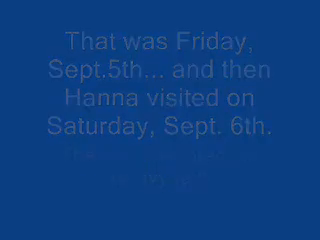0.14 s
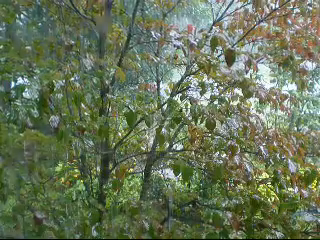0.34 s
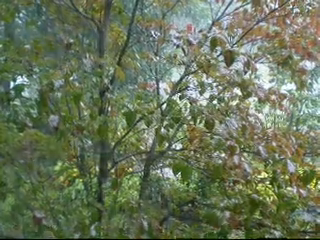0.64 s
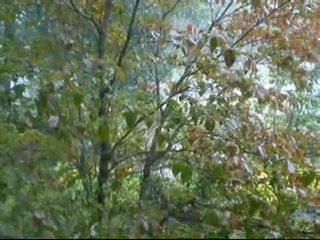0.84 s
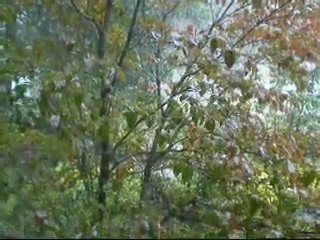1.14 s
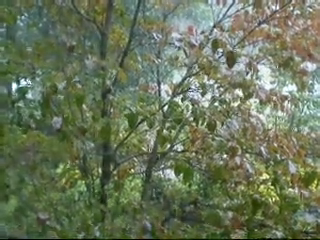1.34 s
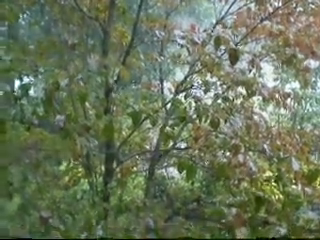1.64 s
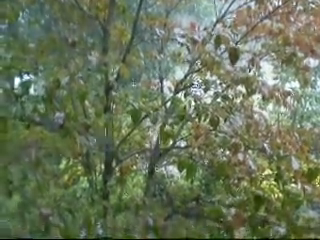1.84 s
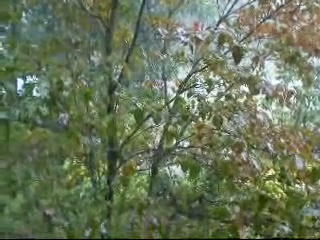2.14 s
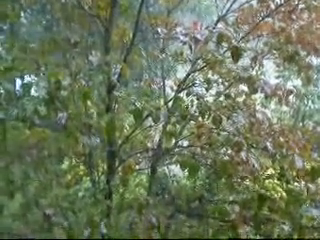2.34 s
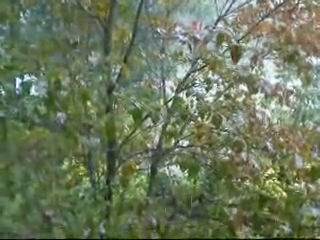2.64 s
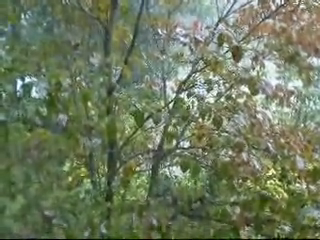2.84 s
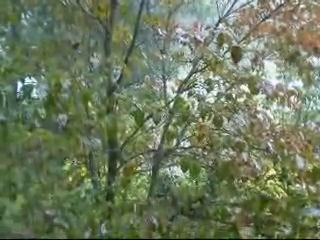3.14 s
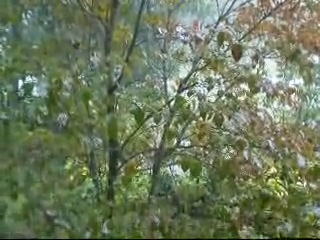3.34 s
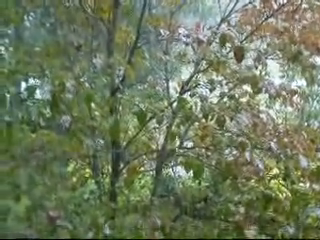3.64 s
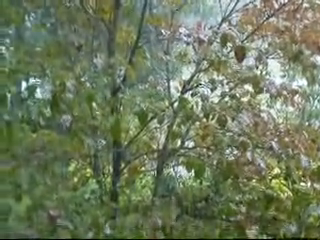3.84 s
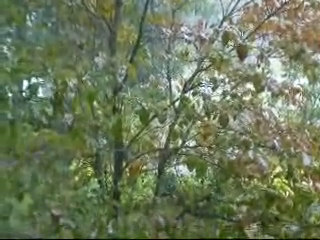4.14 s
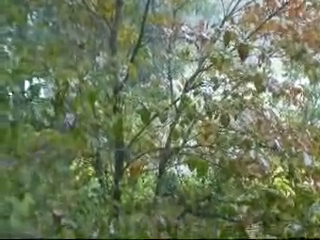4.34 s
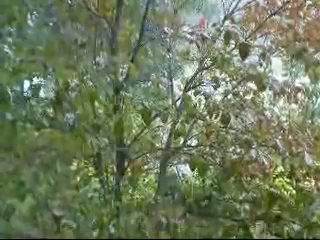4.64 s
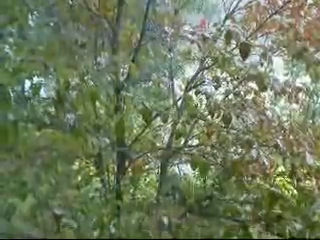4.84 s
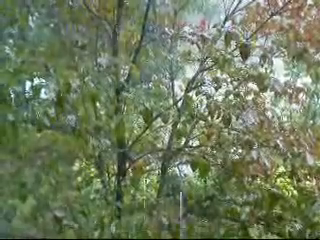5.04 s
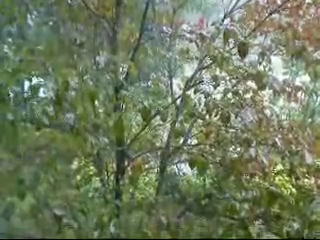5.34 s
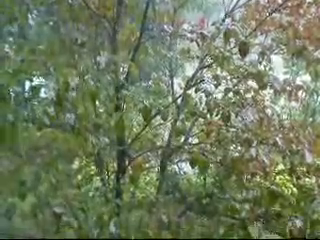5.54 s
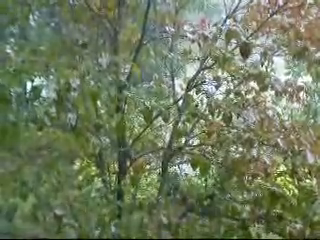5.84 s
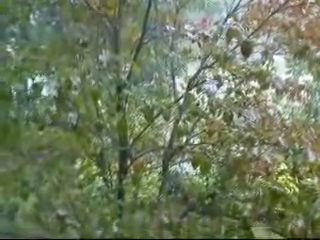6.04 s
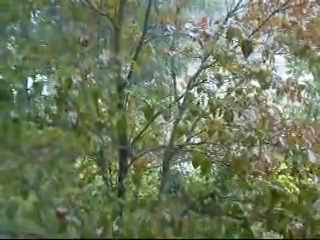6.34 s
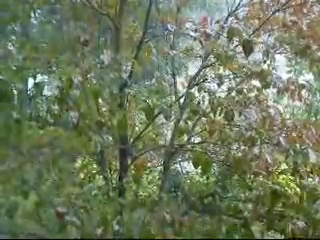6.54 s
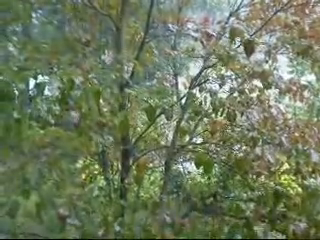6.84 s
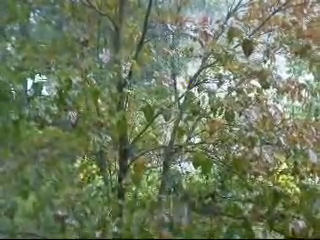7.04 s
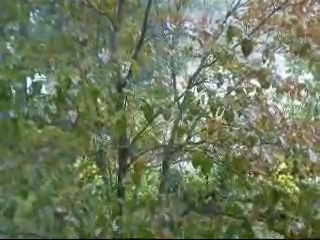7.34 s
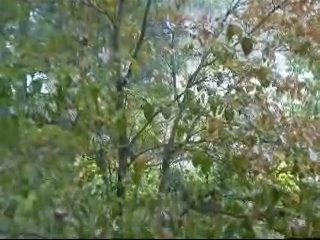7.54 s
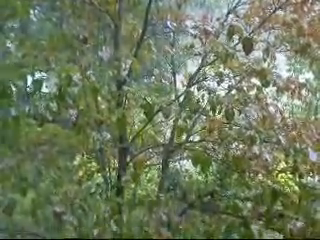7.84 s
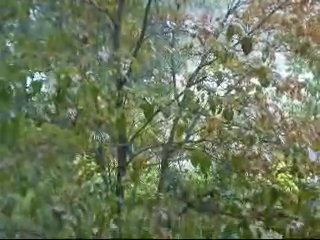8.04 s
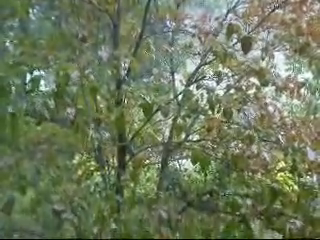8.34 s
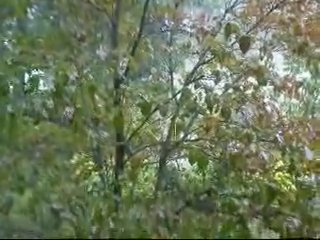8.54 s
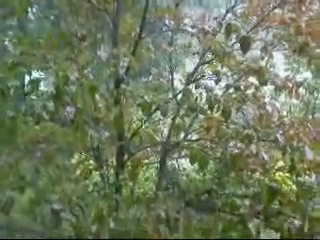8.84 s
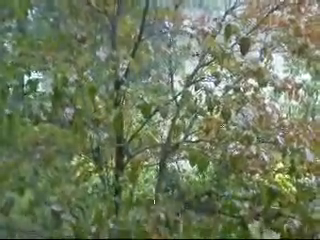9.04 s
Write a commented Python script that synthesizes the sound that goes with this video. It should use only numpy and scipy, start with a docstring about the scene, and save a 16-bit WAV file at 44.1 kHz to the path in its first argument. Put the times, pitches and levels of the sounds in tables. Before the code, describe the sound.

The first 0.47 seconds are silent; then heavy rain starts abruptly, already in full flow. Distant drops blend into a dense, mid-heavy hiss, with constant fine pattering and short ringing taps on leaves. The level is restless: it builds, collapses in an instant and recovers, especially often from 0.5 to 5 seconds. Close drops snap sharply now and then, with stronger ones near 1.7 and 4.8 seconds. From about 5.2 to 6.5 seconds the rain runs more evenly with fewer close hits. Further sags come near 7.1, 7.6 and 8 seconds; the hardest, clipped drop strikes at 7.5, and another clear one at 8.9. A barely audible low rumble comes and goes. Everything is mono, thin in bass, with coarse gritty treble from a small camera, and the rain continues to the end at about 9.2 seconds.

```python
"""Heavy rain on leafy trees

A small camera stands under the leaves; its one microphone, silent at first, feeds both channels.
Countless distant drops merge into a noise wash whose level swells, sags abruptly and creeps back.
Nearer drops patter as short ringing taps, the closest snap sharply, and a faint low rumble comes and goes.
The camera takes about 8000 samples a second and holds each one, which mirrors the rain into a gritty treble.
"""
import sys
import numpy as np
from scipy import signal
from scipy.fft import rfft, irfft
from scipy.io import wavfile
from scipy.ndimage import uniform_filter1d

SR = 44100
rng = np.random.default_rng(int(sys.argv[2]) if len(sys.argv) > 2 else 0)


def dump_mix(stems):
    """Bounce the given channels to the path in sys.argv[1] as a 16-bit WAV at rate SR."""
    frames = np.atleast_2d(stems).T  # one column per channel
    limited = np.clip(frames, -1, 1)  # hard clip at full scale
    pcm = np.round(limited * 32767).astype(np.int16)
    wavfile.write(sys.argv[1], SR, pcm)


N = 404838
TIME = np.arange(N) / SR  # s


def gain_of(db):
    """Decibels to amplitude."""
    return 10 ** (np.asarray(db) / 20)


def evened(x):
    """Scales to an rms of one."""
    return x / np.sqrt(np.mean(x ** 2) + 1e-20)


def follow(curve):
    """A curve's value at every sample."""
    return np.interp(TIME, *np.transpose(curve))


def add(mix, start_s, sound):
    """Mixes a sound in at a given time."""
    part = mix[round(start_s * SR):][:len(sound)]
    part += sound[:len(part)]


def lowpass(x, hz, order):
    """Smooth low-pass with no delay."""
    f = np.fft.rfftfreq(N, 1 / SR)
    return irfft(rfft(x) / np.sqrt(1 + (f / hz) ** (2 * order)), N)


def drift(hz):
    """Random wandering of rms one, mostly slower than the given rate."""
    return evened(lowpass(rng.standard_normal(N), hz, order=2))


def wash(level_db=-2.5, patchy_db=1.1):
    """Distant drops merge into noise, slightly uneven from moment to moment and band to band."""
    # colour of the far rain: (frequency [Hz], relative level [dB])
    wash_colour = [(50, -19), (95, -7), (130, -7), (175, -9), (285, -2.5), (440, -5), (600, -6.5),
                   (780, -5), (1130, 0.24), (1550, -1.5), (2050, -1.5), (2600, -5.5), (3100, -6.5),
                   (4400, -5), (5200, -27)]
    # narrow resonances in the far rain: (frequency [Hz], width [Hz], lift [dB])
    resonances = [(569, 63, 5.5), (701, 67, 5), (887, 39, 5.5), (1114, 30, 3), (1260, 42, 3)]
    hz = np.fft.rfftfreq(1024, 1 / SR)
    real, imaginary, patches = rng.standard_normal((3, N // 256 + 5, len(hz)))
    patches = uniform_filter1d(patches, size=5, axis=0)  # over time
    patches = evened(uniform_filter1d(patches, size=14, axis=1))  # over frequency
    points_hz, points_db = np.transpose(wash_colour)
    colour_db = np.interp(np.log(hz + 1), np.log(points_hz), points_db)
    for centre_hz, width_hz, lift_db in resonances:
        colour_db = colour_db + lift_db / (1 + (2 * (hz - centre_hz) / width_hz) ** 2)
    spectra = (real + 1j * imaginary) * gain_of(colour_db + patchy_db * patches)
    noise = signal.istft(spectra.T, nperseg=1024, noverlap=768)[1][:N]
    return gain_of(level_db) * evened(noise)


def uneven_bass(x, top_hz=200, count=5, patchy_db=4, patchy_hz=6.4):
    """The lowest part of the wash comes and goes, each narrow band by itself."""
    below = np.zeros(N)
    out = x.copy()
    for hz in np.geomspace(top_hz / 2, top_hz, count):
        band = lowpass(x, hz, order=16) - below
        below = below + band
        level = evened(gain_of(patchy_db * np.tanh(drift(patchy_hz))))
        out += band * (level - 1)
    return out


def tap(hz, ring_s, phase):
    """A drop strikes a wet leaf: a swing that builds to a crest at twice ring_s and dies away."""
    t = np.arange(SR // 60) / SR
    u = t / (2 * ring_s)
    envelope = (u * np.exp(1 - u)) ** 4
    return envelope * np.sin(2 * np.pi * hz * (t - 2 * ring_s) + phase)


def patter(level_db, per_s, low_hz, high_hz, cycles, spread_db, count):
    """Drops of random size fall on many leaves, each leaf with a pitch of its own."""
    out = np.zeros(N)
    for hz in np.geomspace(low_hz, high_hz, count):
        ring, phase = rng.random(2)
        chance, size = rng.random((2, N))
        hit = np.flatnonzero(chance < per_s / count / SR)
        blows = np.zeros(N)
        blows[hit] = gain_of(spread_db * np.minimum(-np.log(size[hit]), 3.5))  # big drops are rare
        leaf = tap(hz, cycles * (.5 + ring) / hz, 2 * np.pi * phase)
        out += signal.oaconvolve(blows, leaf)[:N]
    return gain_of(level_db) * evened(out)


def surge_db(fall_s=0.0035, shoulder=2.63):
    """The level builds gradually, collapses in a few milliseconds into a sag, and recovers."""
    # abrupt sags in loudness: (time [s], swell before [dB], sag after [dB], time to build and to recover [s])
    surges = [(.485, -1.5, 7, 0.05), (.589, 1, 4, 0.092), (.658, 0.5, 4, 0.13), (.897, 0.5, 3.5, 0.07),
              (.975, 1, 6, .021), (1.179, 2, 7.5, .09), (1.374, 3, 1.5, .038), (1.53, 0, 4, 0.077),
              (1.901, 2, 0.5, .061), (2.353, 1, 6.5, 0.095), (2.775, 3.5, 0.5, 0.031),
              (2.902, -1, 6.5, 0.13), (3.092, 2.5, 3.5, .057), (3.22, 2, 3, 0.044), (3.439, 2.9, -1, .1),
              (3.658, 5.7, -1, 0.045), (3.84, 1.5, 6, 0.031), (4.0, 6, -0.5, .05), (4.116, 1, 5.5, .12),
              (4.323, 3, 1.5, .045), (4.385, 1, 7, 0.056), (4.629, 5.5, -0.5, .069), (4.889, 9.5, 0, 0.099),
              (5.864, 1.1, 2, 0.043), (5.994, 3, 3, .053), (6.288, 3.5, 3.5, .1), (6.467, 1.7, 4, 0.18),
              (7.127, -1, 10, 0.1), (7.644, 0.5, 7, 0.14), (8.029, 2, 6.5, 0.098), (8.224, 2, 1, 0.069)]
    out = np.zeros(N)
    t = np.arange(-SR // 3, SR // 3) / SR
    fallen = np.clip(t / fall_s, 0, 1)
    for s, swell_db, sag_db, length_s in surges:
        # a larger shoulder holds the crest and the trough longer
        nearness = np.exp(-abs(t / length_s) ** shoulder)
        add(out, s + t[0], (swell_db * (1 - fallen) - sag_db * fallen) * nearness)
    return out


def rumble(level_db=1, floor_db=-75, top_hz=70, bottom_hz=9.6, edge_s=.04):
    """Deep noise under the rain: each swell fades in, holds and fades out over a steady floor."""
    # swells of faint low rumble: (start [s], length [s], level before level_db [dB])
    rumbles = [(0.467, 0.181, -53), (0.932, 0.23, -51), (1.307, 0.44, -58), (2.029, 0.31, -53),
               (2.714, 0.24, -56), (3.029, 0.47, -59), (4.318, 0.19, -55), (4.796, 0.215, -50),
               (7.517, 0.35, -56), (8.15, 0.11, -59), (8.778, 0.22, -58)]
    noise = lowpass(rng.standard_normal(N), top_hz, order=4)
    level = gain_of(floor_db)
    for s, length_s, db in rumbles:
        inside_s = np.minimum(TIME - s, s + length_s - TIME)
        level = level + gain_of(db + level_db) * np.clip(.5 + inside_s / edge_s, 0, 1)
    return level * evened(noise - lowpass(noise, bottom_hz, order=2))


def close_drops(level_db=-2.5, click_db=-11, click_hz=3400, click_s=0.00017, splash_db=-24, splash_s=0.0071,
                echo_db=-16, echo_s=0.0044):
    """The nearest drops: a click of contact, the leaf's snap, its echo, and a brief spatter of droplets."""
    # drops nearest the microphone: (time [s], peak before level_db [dB], pitch [Hz], ring [cycles])
    drops = [(0.482, -10, 3030, 0.73), (.5357, -11.5, 2180, .7), (.6421, -15, 1520, .4),
             (0.8825, -10, 2930, 0.56), (1.011, -11, 2800, 0.95), (1.1292, -8.5, 3450, 0.74),
             (1.6875, -4, 1900, 0.87), (2.2397, -14, 2750, 0.8), (2.3157, -10, 1130, 1.1),
             (2.56, -11.5, 2750, 1.3), (2.7471, -11, 2750, 0.69), (3.075, -10, 1960, .3),
             (3.1757, -16, 3300, 0.9), (3.2757, -11, 3350, 0.63), (3.3267, -8.5, 3260, .6),
             (3.4118, -7.5, 2900, 0.62), (3.6428, -20, 2040, .7), (3.9875, -19.5, 650, 1),
             (4.1165, -13, 1950, 0.42), (4.2463, -17, 3550, 1.5), (4.4265, -17, 3510, .8),
             (4.5393, -14, 1710, .7), (4.803, -4, 1910, 0.32), (4.9306, -8, 3160, 0.54),
             (6.7298, -9, 2320, 0.85), (6.8853, -11, 3500, 0.63), (7.54, 6.5, 2220, 0.77),
             (7.7726, -8, 2540, .4), (7.819, -12, 3460, 0.73), (8.8755, -1, 2270, 0.58)]
    out = np.zeros(N)
    t = np.arange(SR // 25) / SR
    for s, db, hz, cycles in drops:
        phase, ring_s = rng.uniform(0, 2 * np.pi), cycles / hz
        click = tap(click_hz, click_s, phase)
        snap = gain_of(db + level_db) * tap(hz, ring_s, phase)
        # noise tinted with the pitch of the snap
        spatter = evened(signal.fftconvolve(rng.standard_normal(len(t)), snap)[:len(t)])
        spatter = spatter * np.exp(-t / splash_s)
        add(out, s - ring_s - click_s, gain_of(db + click_db) * click)
        add(out, s - ring_s, snap)
        add(out, s - ring_s + echo_s, gain_of(echo_db) * snap)
        add(out, s, gain_of(db + splash_db) * spatter)
    return out


def scene(rain_db=0.5, split_hz=2200, bass_hz=84, flutter_db=1.07, flutter_hz=16,
          spray_follows=0.79, spray_drift_db=.7, spray_drift_hz=5.6):
    """Wash and patter surge together, the treble spray a little less; one microphone feeds both channels."""
    # underlying loudness before rain_db and surges: (time [s], level [dB])
    rain_level = [(0.47, -27), (0.83, -24), (1.1, -29.4), (1.62, -31.0), (1.8, -25), (2.3, -27),
                  (3.0, -28.1), (3.7, -29.5), (4.4, -27.2), (4.98, -32), (5.15, -25.5), (5.65, -27.5),
                  (6.55, -28), (7.42, -24.5), (7.72, -25.5), (8.33, -29), (8.45, -25.2), (9.17, -28.5)]
    # treble spray against the body of the rain, before its drift: (time [s], level [dB])
    spray_level = [(.47, 0.1), (1.2, -0.2), (1.8, -0.5), (2.6, 0.4), (3.3, -0.5), (3.8, -1.7), (4.4, -0.3),
                   (4.9, -0.5), (5.2, -0.2), (5.5, 1), (6.2, -0.3), (7.1, 1.2), (7.5, 0.3), (8.3, 2),
                   (8.7, 1.5), (9.17, 0.1)]
    plops = patter(level_db=-12.0, per_s=450, low_hz=826, high_hz=2320, cycles=0.912, spread_db=2.5, count=16)
    ticks = patter(level_db=-13.5, per_s=430, low_hz=2034, high_hz=3800, cycles=0.554, spread_db=2.5, count=16)
    drips = patter(level_db=-18, per_s=22, low_hz=2000, high_hz=3700, cycles=0.53, spread_db=1.3, count=8)
    rain = uneven_bass(wash()) + plops + ticks + drips
    rain = rain - lowpass(rain, bass_hz, order=12)  # the microphone passes almost no deep bass

    flutter = flutter_db * drift(flutter_hz)  # quick chance changes of loudness
    loudness_db = rain_db + follow(rain_level) + surge_db() + flutter
    # the spray takes only a share of each change in loudness
    spray_db = (spray_follows - 1) * (loudness_db - loudness_db.mean()) + follow(spray_level)
    spray_db = spray_db + spray_drift_db * drift(spray_drift_hz)
    body = lowpass(rain, split_hz, order=3)
    spray = (rain - body) * gain_of(spray_db)
    rain = (body + spray) * gain_of(loudness_db)
    return np.tile(rain + close_drops() + rumble(), (2, 1))


def record(dry, ceiling=0.43, offset=-0.019, start_s=.466, camera_hz=8000.7, edge_hz=15740):
    """The camera starts, clips the biggest drops, and holds each of its slow samples as a step."""
    # treble response after the steps: (frequency [Hz], gain [dB])
    treble = [(6000, -0.5), (9300, 1.5), (10600, 1.5), (11800, -4), (12300, -12), (15500, -16.5)]
    heard = np.clip(lowpass(dry[0], camera_hz / 2, order=16), -ceiling, ceiling)
    heard = np.where(TIME > start_s, heard + offset, 0)  # the converter sits slightly off zero
    instants = np.arange(0, N / SR + 1 / camera_hz, 1 / camera_hz)
    samples = np.interp(instants, TIME, heard)
    # the steps, averaged over each output sample, mirror the spectrum around the camera's rate
    area = np.interp(TIME, instants + .5 / camera_hz, np.cumsum(samples) / camera_hz)
    steps = np.diff(area, prepend=area[0]) * SR
    colour = gain_of(np.interp(np.fft.rfftfreq(N, 1 / SR), *np.transpose(treble)))
    out = irfft(rfft(steps) * colour, N)
    top_cut = signal.firwin(511, edge_hz, window=("kaiser", 9), fs=SR)
    out = signal.oaconvolve(out, top_cut, "same")
    return np.tile(out, (2, 1))


dry = scene()
out = record(dry)
dump_mix(out)
```